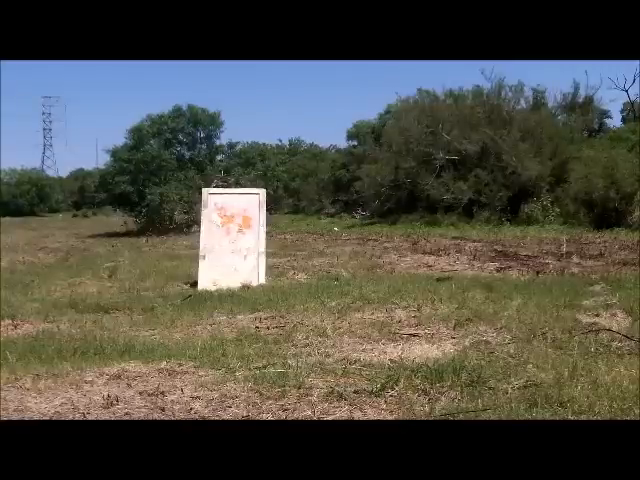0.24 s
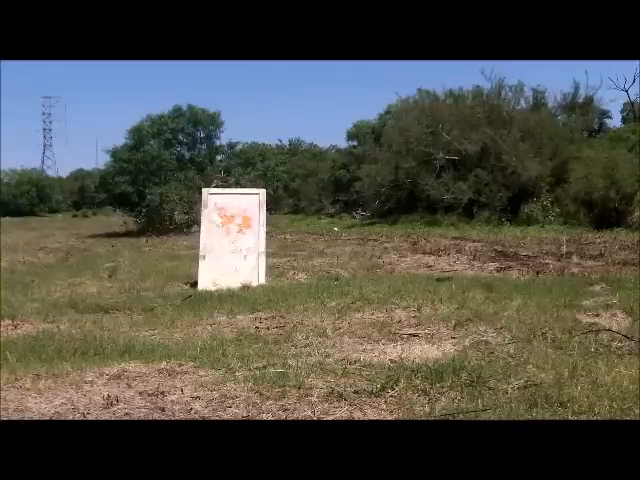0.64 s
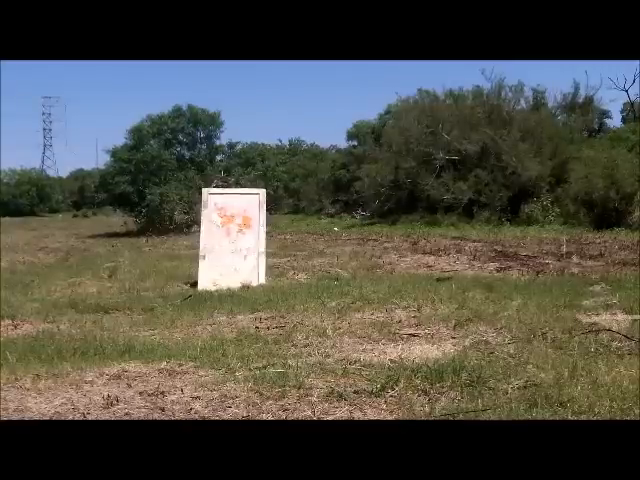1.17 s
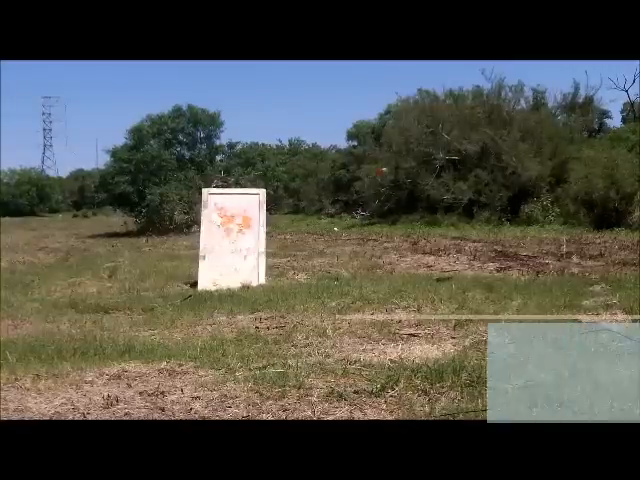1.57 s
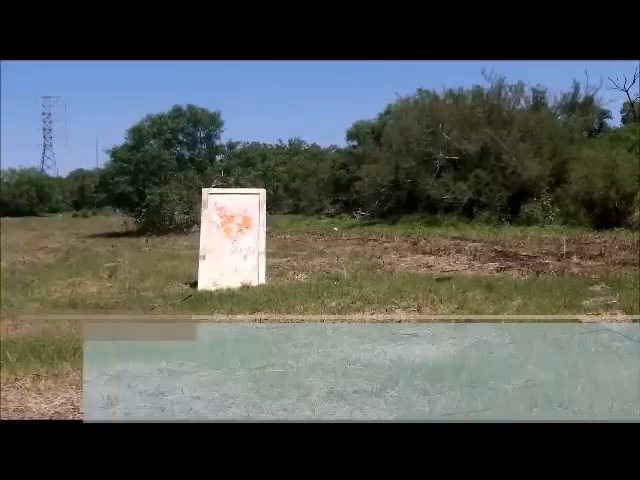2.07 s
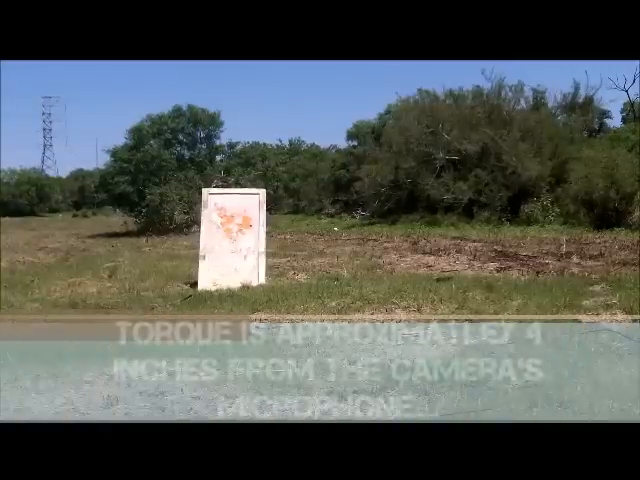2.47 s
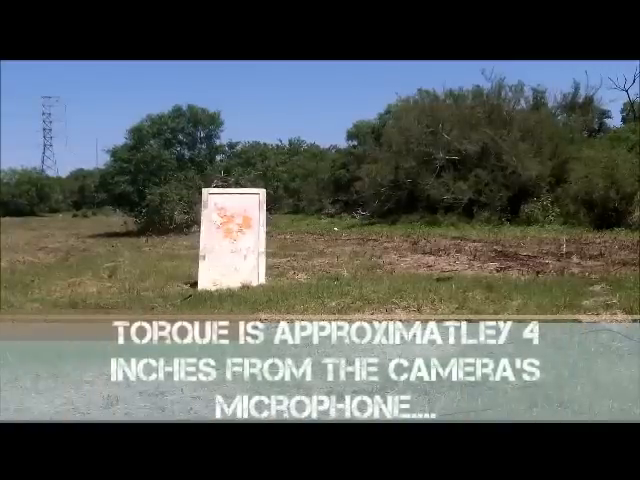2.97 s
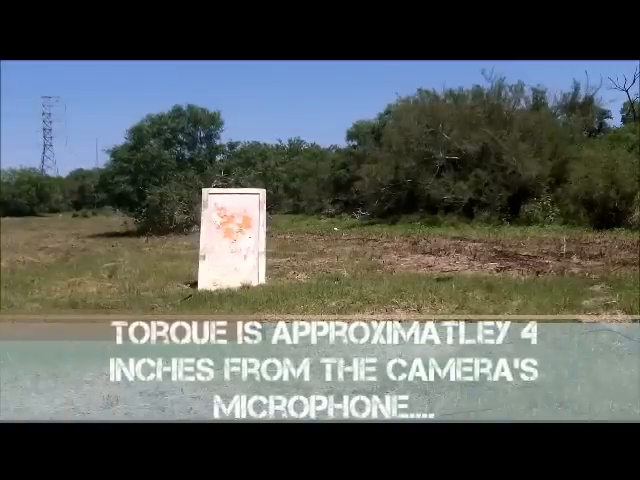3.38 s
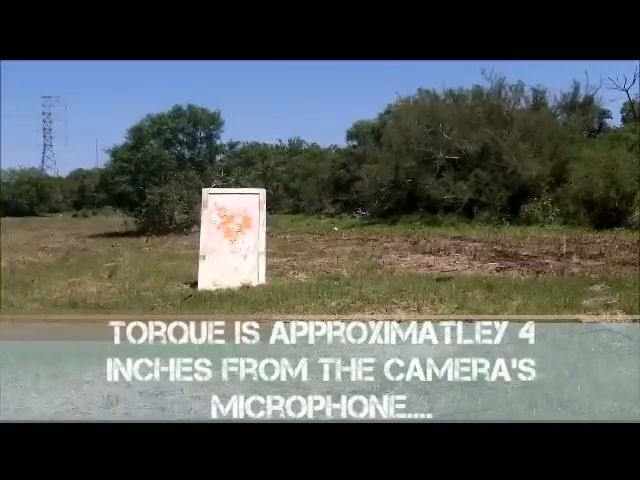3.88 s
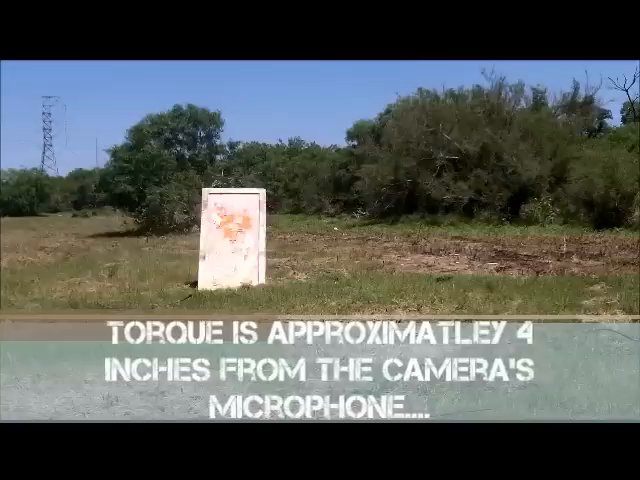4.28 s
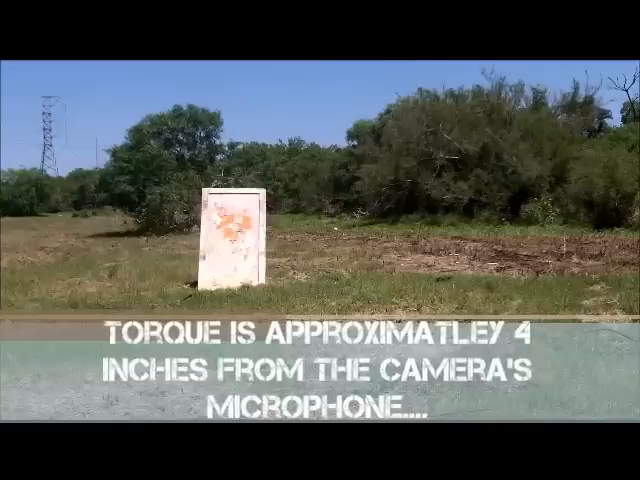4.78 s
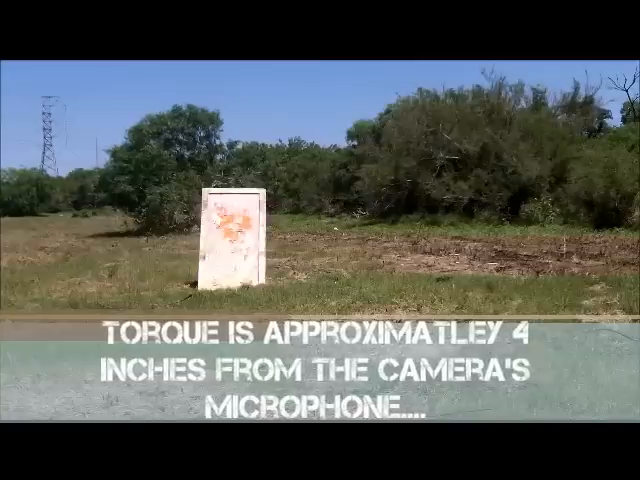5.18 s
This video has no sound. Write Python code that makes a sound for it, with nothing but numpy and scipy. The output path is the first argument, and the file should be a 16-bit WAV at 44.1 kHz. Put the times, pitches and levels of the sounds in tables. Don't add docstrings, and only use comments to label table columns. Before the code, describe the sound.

An open field, heard through a small camera microphone with faint hiss. For the first 0.8 s there is low wind rumble with soft buffets, strongest near 0.6 s, brief upward bird whistles and faint cricket pulses over a distant leafy, traffic-like wash. At 0.8 s a paintball marker fires within arm's reach: metallic bolt clack, dry airy pop, sharp gas burst, then the bolt clicking home. A second shot comes at 1.1 s, then a rapid even string from 1.3 to 3.8 s, about seven per second. Each ball smacks a hollow door roughly 0.18 s later, a crack with a woody thud and splatter, blending with ground and tree-line echoes. The loud shots sound clamped, ducking everything after them. Single shots follow at 4.35 and 4.99 s, with their door hits at 4.5 and 5.2 s; birds and a faint cricket chirp between them before the echoes fade at 5.4 s.

```python
import sys
import numpy as np
from scipy import signal
from scipy.fft import rfft, irfft
from scipy.io import wavfile
from scipy.ndimage import uniform_filter1d

SR = 44100
rng = np.random.default_rng(int(sys.argv[2]) if len(sys.argv) > 2 else 0)


def store_pcm(level_fs):
    pcm = np.round(np.clip(level_fs, -1, 1) * 32767).astype(np.int16)
    wavfile.write(sys.argv[1], SR, np.atleast_2d(pcm).T)


def natural_amplitude(level_db):
    exponent = np.asarray(level_db, float) / 20
    return 10 ** exponent


N = 239639

# frequency in Hz, level in dB per Hz.
FIELD_SPECTRUM = [(60, -31.5), (120, 3.5), (250, -8.5), (500, -7.5), (1000, -11.5), (2000, -14.5),
                  (4000, -19.5), (6000, -21.5), (8000, -21), (10000, -23)]
# frequency in Hz, level in dB per Hz.
WIND_SPECTRUM = [(6, 7.5), (18, -1.5), (30, -11), (60, -1), (120, -8.5), (250, -11), (500, -34.5),
                 (1000, -45)]
# time in seconds, level in dB.
WIND_LEVEL = [(0.0, -44.5), (0.5, -41.5), (0.75, -36), (1.1, -37), (1.35, -39), (1.7, -37.5), (2.3, -34.5),
              (3.0, -39.5), (3.4, -38), (3.75, -45), (4.1, -38.5), (4.5, -46), (5.43, -43)]
# time in seconds, push in dB, push in Hz, shell knock in dB.
BUFFETS = [
    (.188, -24, 59.6, -54),
    (0.38, -24, 38, -36),
    (0.53, -22, 70.5, -56),
    (0.577, -12.5, 57, -28.5),
    (0.622, -18, 71.4, -39),
    (0.637, -19.5, 110, -34),
]
# frequency in Hz, level in dB per Hz.
TREE_SPECTRUM = [(150, -22), (500, -12), (1300, -6), (1900, -5), (2600, 0), (3400, -5), (6000, -15),
                 (10000, -26)]
# start in seconds, length in seconds, start in Hz, end in Hz, level in dB.
BIRDS = [
    (.07, .055, 3800, 4020, -49),
    (.205, .036, 3300, 4850, -46),
    (.965, .026, 4000, 4001, -51),
    (1.095, .035, 3600, 4700, -46),
    (4.29, .058, 3900, 5000, -44),
    (4.635, .035, 4500, 5300, -52),
    (4.755, .032, 3850, 4750, -46),
    (4.955, .03, 2000, 2700, -50),
    (.612, .02, 3420, 3520, -57),
]
# start in seconds, level in dB.
CRICKET_PULSES = [(0.003, -50), (.275, -52), (.382, -56), (0.448, -54), (0.487, -55), (.546, -59),
                  (0.679, -55), (4.828, -65), (4.885, -53), (4.958, -63)]
# arrival in seconds, smack in dB, panel thud in dB.
HITS = [(.9888, -12, -11), (1.3144, -10, -7), (1.4851, -20, -11.5), (1.6522, -22.5, -9), (1.7818, -19, -11),
        (1.9331, -15, -14), (2.0687, -19.5, -16), (2.2078, -24, -11), (2.3522, -13.5, -11),
        (2.4972, -19.5, -12.5), (2.632, -18, -15), (2.7692, -18, -9.5), (2.9142, -24, -10.5),
        (3.0502, -24, -11.5), (3.1942, -12.5, -8.5), (3.3472, -33, -10), (3.5055, -22, -12.5),
        (3.6559, -15, -14.5), (3.8149, -19, -11), (3.9728, -11.5, -7), (4.5273, -12, -7), (5.1607, -14, -6)]
# mode in Hz, level in dB, t60 in seconds.
SMACK_MODES = [(1300, -9, .007), (1800, 0, .007), (2300, 3, .006), (2900, 0, .006), (3600, 0, .005),
               (5300, -3, .004), (6500, -2, .003), (10000, 3, .002), (13000, 4, .002)]
# mode in Hz, level in dB, t60 in seconds.
THUD_MODES = [(121, -21.5, 0.15), (158.4, -0.5, 0.11), (210, 5.5, 0.085), (239.6, -4.5, 0.11),
              (290.4, -4, 0.1), (355, -2, 0.075), (422, 9.5, 0.043), (481, -7, 0.18)]
# frequency in Hz, level in dB per Hz.
SPLAT_SPECTRUM = [(400, -27), (1000, -11), (2000, -1), (3500, -4), (6000, -3), (10000, -10.5), (16000, -31)]
# start in seconds, bolt clack in dB.
SHOTS = [(0.8132, 6.5), (1.1380, 6), (1.3066, 4.5), (1.472, 3.5), (1.6097, 0.5), (1.7527, 1), (1.8928, 2),
         (2.034, 1.5), (2.1779, 3), (2.3246, 4), (2.46, 3), (2.5951, 0.5), (2.74, 1), (2.8722, -1.5),
         (3.0234, 1), (3.1774, 0), (3.3306, 0.5), (3.4791, 1.5), (3.6413, 3), (3.7973, 3), (4.3488, 7),
         (4.9867, 5.5)]
# mode in Hz, level in dB, t60 in seconds.
CLACK_MODES = [(1037, 1, 0.011), (2072, -5.5, 0.011), (3018, 9, 0.0047), (4140, -1, 0.015),
               (5640, 6, 0.0061), (9450, -8, .01)]
# mode in Hz, level in dB, t60 in seconds.
BARREL_MODES = [(175, 15.5, 0.0048), (288.6, -8, 0.17), (586.6, -13, 0.1), (914, 3, 0.01),
                (1227, -4.5, 0.019)]
# mode in Hz, level in dB, t60 in seconds.
CRACK_MODES = [(1210, 0, 0.0018), (1830, -0.5, 0.0045), (2620, 0.5, 0.0027), (3055, -4, 0.0069),
               (6230, -15, 0.0086), (9800, 2.5, 0.011)]
# mode in Hz, level in dB, t60 in seconds.
RETURN_MODES = [(447, 3.5, 0.037), (1300, -3.5, 0.026), (2464, 10, 0.016), (2870, -15, 0.0049),
                (3740, 6.5, 0.012), (4580, 8.5, 0.013), (5100, 10, 0.0094), (8900, 2, 0.012)]
# frequency in Hz, level in dB per Hz.
GAS_SPECTRUM = [(300, 9), (1000, 5), (2000, 3), (3100, 9.5), (4200, 8), (5200, 4.5), (7000, 5),
                (10000, 5.5), (13000, 7), (16000, -68)]
# frequency in Hz, gain in dB.
MIC_RESPONSE = [(20, 0), (3000, 0), (5000, -6), (6500, -11), (7300, -22), (8100, -40), (8700, -27),
                (10100, -14), (11500, -24), (14000, -33), (16500, -50)]
# frequency in Hz, level in dB per Hz.
HISS_SPECTRUM = [(3000, -20), (7000, -8), (8200, -14), (9200, -1), (11000, 0), (14900, 0), (15300, -30)]

HISS_DB = -65.5
UNEVEN_DB = 0.98


def evened(x):
    return x / np.sqrt(np.mean(x ** 2) + 1e-20)


def read(points, at):
    f, value = np.transpose(points)
    return np.interp(np.log(at + 1), np.log(f + 1), value)


def add(mix, s, sound):
    part = mix[round(s * SR):][:len(sound)]
    part += sound[:len(part)]


def colour(x, spectrum):
    log_gain = np.log(natural_amplitude(read(spectrum, abs(np.fft.fftfreq(8192, 1 / SR)))))
    taps = np.fft.ifft(np.exp(np.conj(signal.hilbert(log_gain)))).real[:2048]
    return signal.oaconvolve(x, taps)[:len(x)]


def drift(top_hz):
    hz = np.fft.rfftfreq(N, 1 / SR)
    return evened(irfft(rfft(rng.standard_normal(N)) / (1 + (hz / top_hz) ** 4), N))


def shut(x, shut_s, soft_s):
    t = np.arange(len(x)) / SR
    return x / (1 + np.exp(np.clip((t - shut_s) / soft_s, -50, 50)))


def ring(modes, detune, wobble_db, scatter, rise_s):
    t = np.arange(SR // 4)[:, None] / SR
    hz, db, t60 = np.transpose(modes)
    balance, pitch, phase = rng.standard_normal((3, len(modes)))
    level = natural_amplitude(db + wobble_db * balance - 60 * t / t60)
    partials = level * np.sin(2 * np.pi * hz * (1 + detune * pitch) * t + scatter * phase)
    return partials.sum(1) * (1 - np.exp(-t[:, 0] / rise_s))


def puff(spectrum, rise_s, t60, shut_s, flutter=0, flutter_hz=287):
    t = np.arange(SR // 10) / SR
    noise = evened(colour(rng.standard_normal(len(t)), spectrum))
    shape = (1 - np.exp(-t / rise_s)) * natural_amplitude(-60 * t / t60)
    shape *= 1 + flutter * np.cos(2 * np.pi * flutter_hz * t + 1.0)
    return shut(noise * shape, shut_s, .0025)


def field(level_db=-46.0):
    wash = evened(colour(rng.standard_normal(N), FIELD_SPECTRUM))
    return natural_amplitude(level_db) * wash * natural_amplitude(1.2 * drift(5.3))


def tree_line(x, start_s, swell_s, t60):
    t = np.arange(SR) / SR
    signs = rng.choice([-1., 1.], SR)
    present = rng.random(SR) < 4000 / SR
    taps = signs * present * natural_amplitude(2.8 * np.minimum(rng.exponential(1, SR), 5))
    late = np.maximum(t - start_s, 0)
    swell = (1 - np.exp(-late / swell_s)) * natural_amplitude(-60 * late / t60)
    tail = colour(taps * swell, TREE_SPECTRUM)
    return signal.fftconvolve(x, tail / np.linalg.norm(tail))[:N]


def wind():
    t = np.arange(N) / SR
    rumble = evened(colour(rng.standard_normal(N), WIND_SPECTRUM) * natural_amplitude(drift(15)))
    out = rumble * natural_amplitude(np.interp(t, *np.transpose(WIND_LEVEL)))
    for s, db, hz, knock_db in BUFFETS:
        lag = t[:SR // 10] - .02
        push = natural_amplitude(db) * np.cos(2 * np.pi * hz * lag + 1.12) * np.exp(-(hz * lag / 0.2) ** 2)
        knock = natural_amplitude(knock_db) * np.cos(2 * np.pi * 440 * lag) * np.exp(-(lag / 0.0033) ** 2)
        add(out, s - .02, -push - knock)
    return out


def wildlife():
    cricket_hz, pulse_s = 4210, .017
    out = np.zeros(N)
    calls = BIRDS + [(s, pulse_s, cricket_hz, cricket_hz, db) for s, db in CRICKET_PULSES]
    for s, length, start_hz, end_hz, db in calls:
        u = np.linspace(0, 1, round(length * SR))
        bend = 0.9 + 1.5 / (1 + np.exp((3895 - start_hz) / 12))
        hz = start_hz + (end_hz - start_hz) * u ** bend
        waver = natural_amplitude(2.2 * np.sin(2 * np.pi * (70 * u * length + rng.random())))
        swell = np.sqrt(2 * np.sin(np.pi * u).clip(0))
        add(out, s, natural_amplitude(db) * waver * swell * np.sin(2 * np.pi * np.cumsum(hz) / SR))
    return out + natural_amplitude(-9) * tree_line(out, .004, .008, .09)


def door():
    out, bangs = np.zeros(N), np.zeros(N)
    for s, crack_db, thud_db in HITS:
        echo_db = -2.5 + UNEVEN_DB * rng.standard_normal()
        crack = natural_amplitude(crack_db + 4) * ring(SMACK_MODES, .03, 1, .15, .00004)
        thud = -natural_amplitude(thud_db - 16.5) * ring(THUD_MODES, .03, 1.5, .5, .0012)
        splatter = natural_amplitude(crack_db - 11) * puff(SPLAT_SPECTRUM, .0001, .025, .033)
        add(out, s + 0.00014, crack)
        add(out, s + 0.00045, splatter)
        add(out, s + 0.0013, thud)
        add(out, s + .0144, natural_amplitude(-20) * crack + natural_amplitude(-9) * thud)
        add(out, s + .0488, natural_amplitude(echo_db - 26) * puff(SPLAT_SPECTRUM, 0.00018, 0.032, 0.036))
        add(bangs, s, np.ones(1))
    wash = tree_line(bangs, .08, .16, .75)
    grass = tree_line(bangs, .003, 0.011, 0.81)
    return out + natural_amplitude(-6.0) * wash + natural_amplitude(-7.5) * grass


def marker():
    out = np.zeros(N)
    for s, clack_db in SHOTS:
        jet_db, return_db = np.array([1, -13.5]) + UNEVEN_DB * rng.standard_normal(2)
        fired, home = s + .0107, s + .0508
        add(out, s - .007, natural_amplitude(-29) * puff(SPLAT_SPECTRUM, 0.0073, 0.11, 0.027))
        add(out, s - .0004, natural_amplitude(clack_db - 14) * ring(CLACK_MODES, .012, 1.2, .25, .0005))
        add(out, s, natural_amplitude(clack_db - 18) * puff(SPLAT_SPECTRUM, 0.00043, 0.036, 0.0076))
        pop = natural_amplitude(-3) * ring(BARREL_MODES, .012, .6, .12, .0014)
        add(out, fired, -.85 * shut(pop, 0.013, 0.00033) - 0.21 * pop)
        add(out, fired + .0009, -natural_amplitude(-3.5) * ring(CRACK_MODES[:-1], .05, 1.2, .3, .0001))
        jet = puff(GAS_SPECTRUM, 0.0024, 0.094, 0.028, flutter=0.17)
        add(out, fired - .0015, natural_amplitude(jet_db - 8) * jet)
        add(out, fired + .0046, -natural_amplitude(jet_db - 8) * ring(CRACK_MODES, .04, 3, .2, .00006))
        add(out, home, natural_amplitude(return_db - 11) * ring(RETURN_MODES, .012, 1.5, .4, .0004))
        add(out, home, natural_amplitude(return_db - 10) * puff(GAS_SPECTRUM, 0.00073, 0.049, 0.035))
    return out


def scene():
    gun = marker()
    gun_echo = natural_amplitude(-35.0) * tree_line(gun, 0.0059, 0.015, 0.58)
    return (gun + gun_echo + door() + wind() + field() + wildlife())[None]


def limiter(x):
    ceiling, release_s = .52, .18
    loudness = uniform_filter1d(abs(x), size=12)
    over_db = np.maximum(20 * np.log10(1.256 * loudness / ceiling + 1e-9), .01)
    clock = np.arange(N) / SR / release_s
    held_db = np.exp(np.maximum.accumulate(np.log(over_db) + clock) - clock)
    ducking_db = uniform_filter1d(held_db, size=25, origin=12)
    return np.clip(x / natural_amplitude(ducking_db), -ceiling, ceiling)


def starve(x):
    hz, _, z = signal.stft(x, SR, nperseg=512)
    patch = uniform_filter1d(uniform_filter1d(abs(z) ** 2, size=14, axis=0), size=5, axis=1)
    margin_db = 10 * np.log10(patch * 512 / 1.5 + 1e-20) - HISS_DB + 2.4
    faint = (hz > 11300) | (abs(hz - 8000) < 650)
    keep = .12 + .88 / (1 + np.exp(np.clip(-margin_db / .5, -50, 50)))
    return signal.istft(z * np.where(faint[:, None], keep, 1), SR, nperseg=512)[1][:N]


def band_limit(x):
    return signal.sosfilt(signal.butter(12, 15900, fs=SR, output="sos"), x)


def record(dry):
    hiss = natural_amplitude(HISS_DB) * colour(rng.standard_normal(N), HISS_SPECTRUM)
    x = limiter(colour(dry[0], MIC_RESPONSE) + hiss)
    return band_limit(starve(x)[None])


dry = scene()
out = record(dry)
store_pcm(out)
```